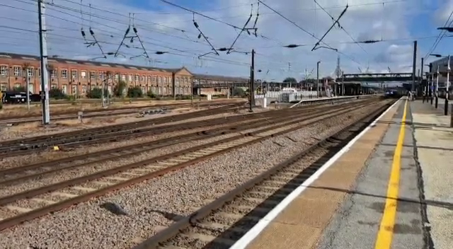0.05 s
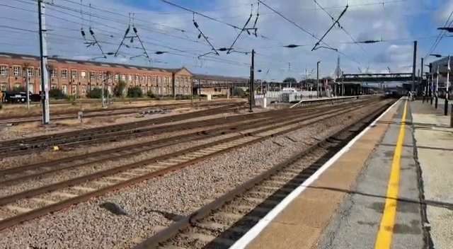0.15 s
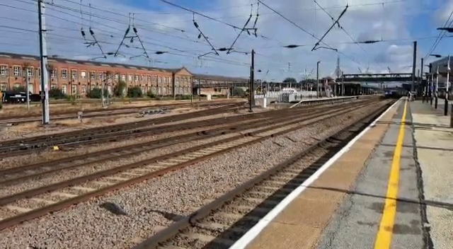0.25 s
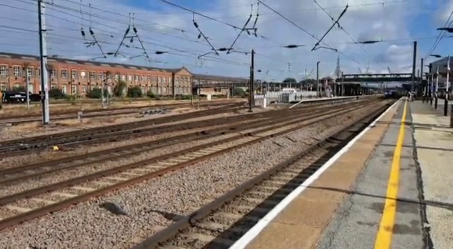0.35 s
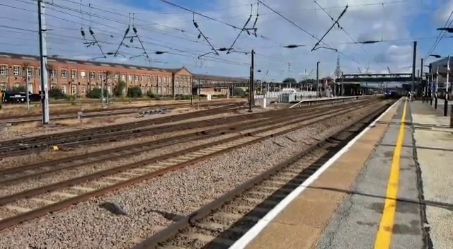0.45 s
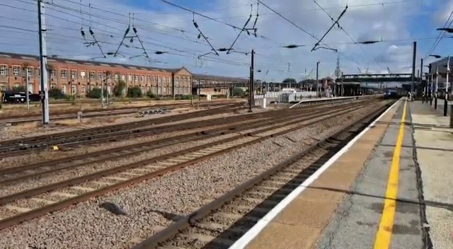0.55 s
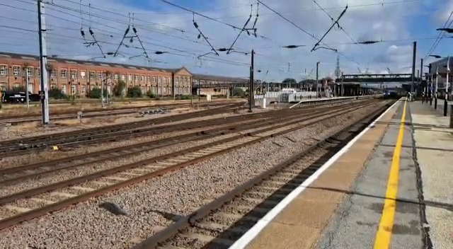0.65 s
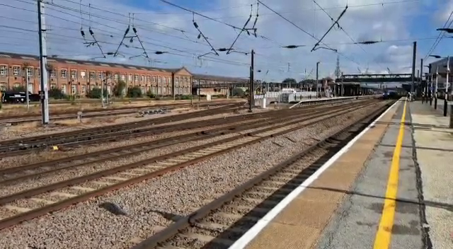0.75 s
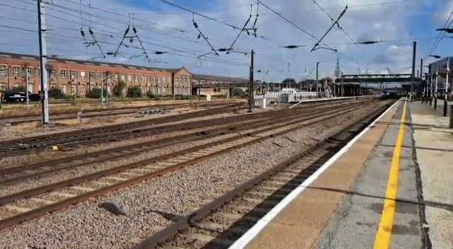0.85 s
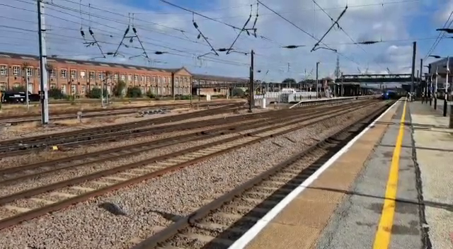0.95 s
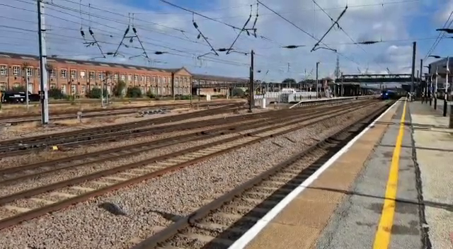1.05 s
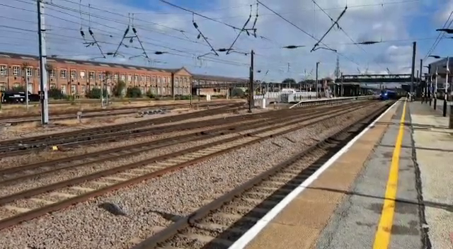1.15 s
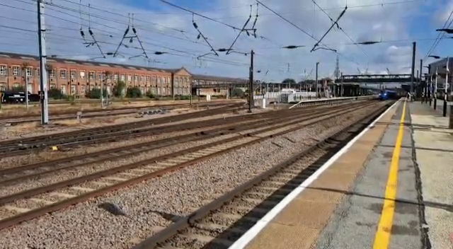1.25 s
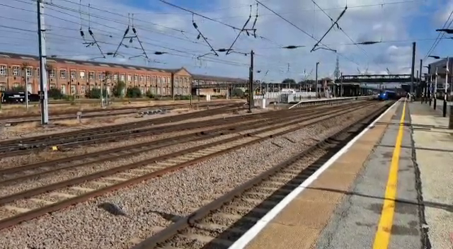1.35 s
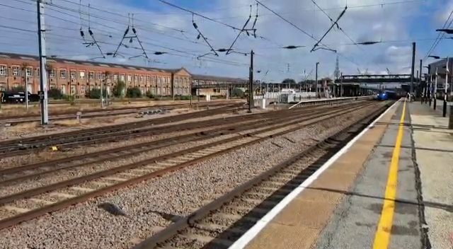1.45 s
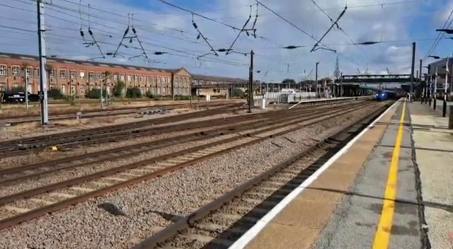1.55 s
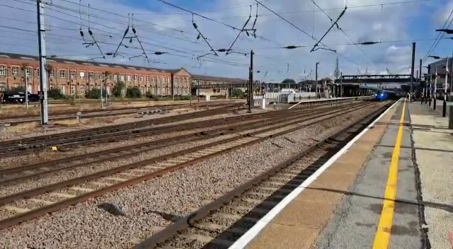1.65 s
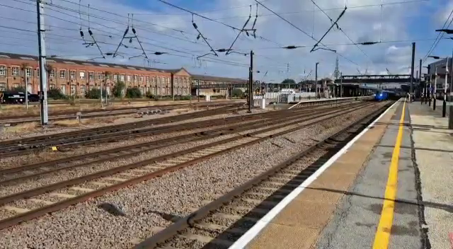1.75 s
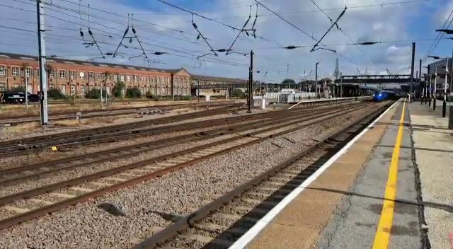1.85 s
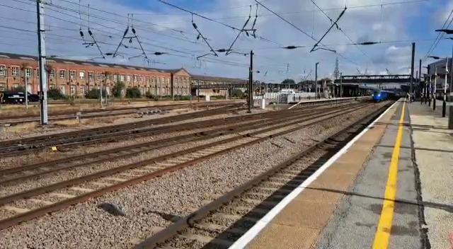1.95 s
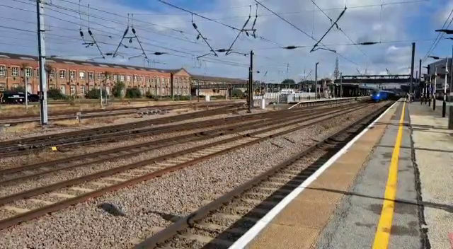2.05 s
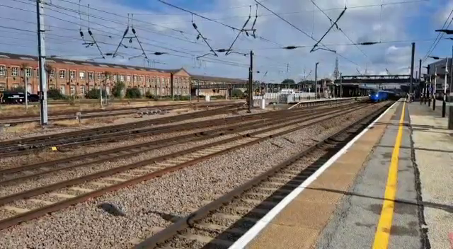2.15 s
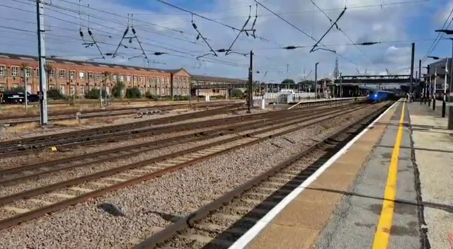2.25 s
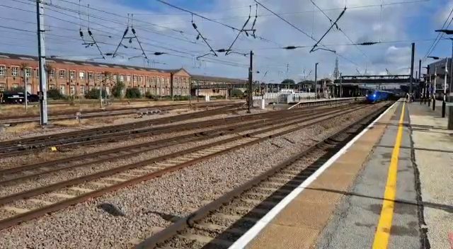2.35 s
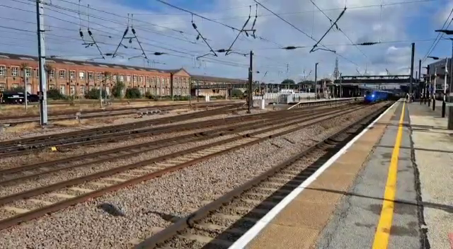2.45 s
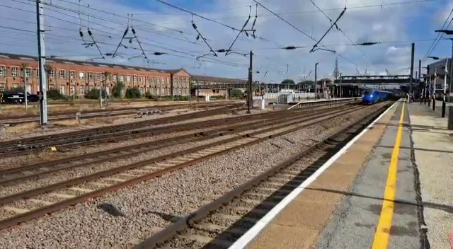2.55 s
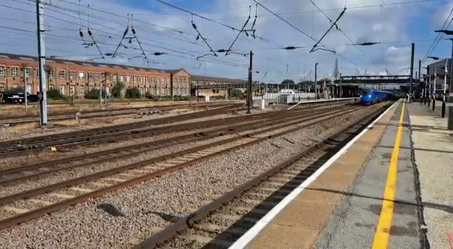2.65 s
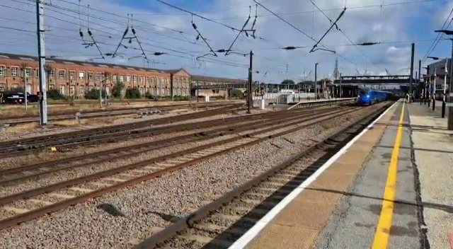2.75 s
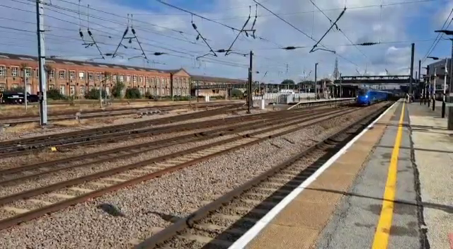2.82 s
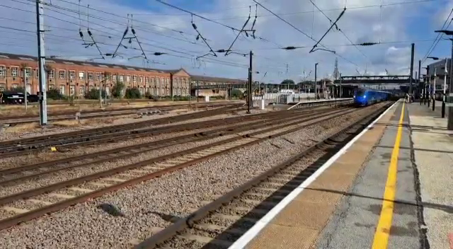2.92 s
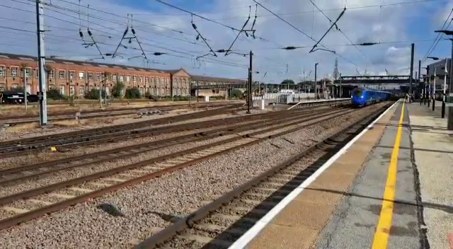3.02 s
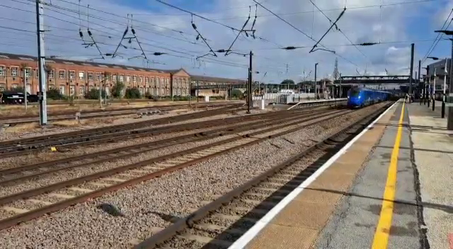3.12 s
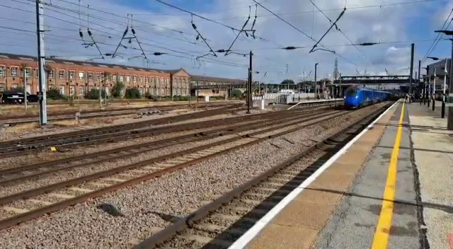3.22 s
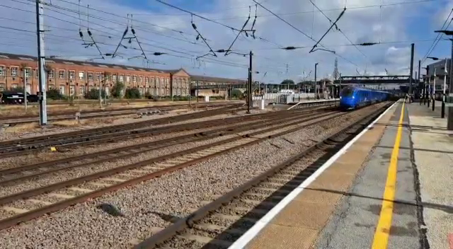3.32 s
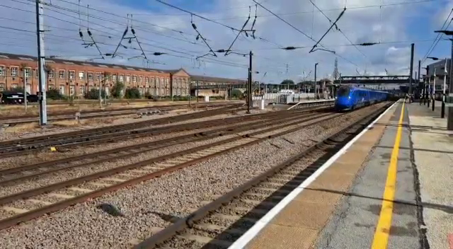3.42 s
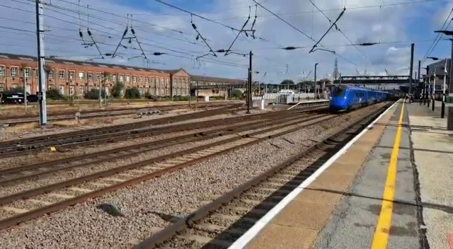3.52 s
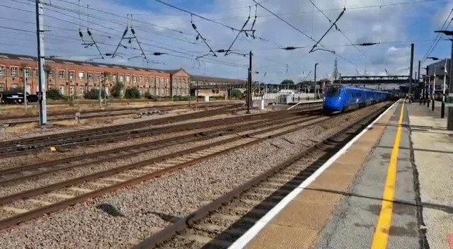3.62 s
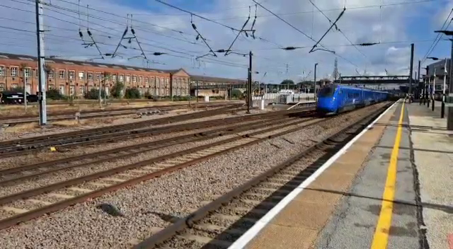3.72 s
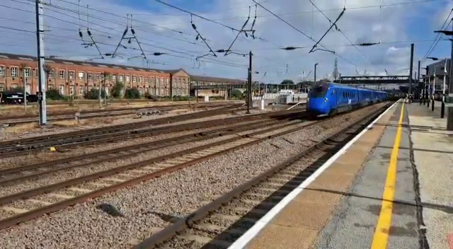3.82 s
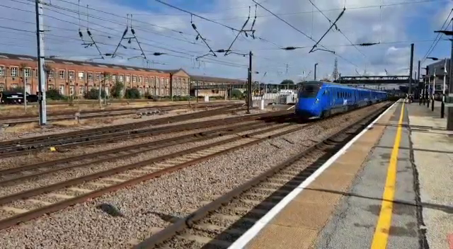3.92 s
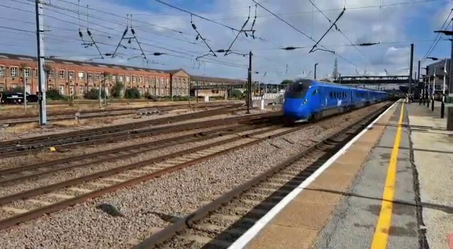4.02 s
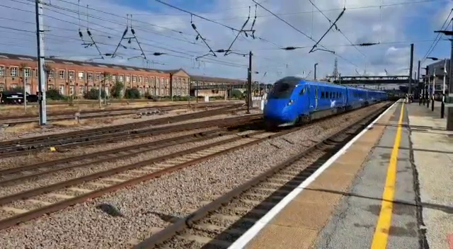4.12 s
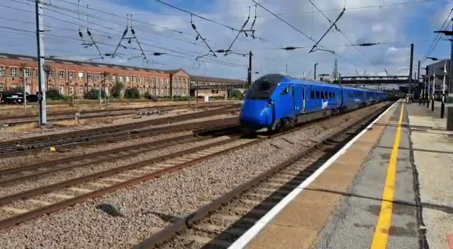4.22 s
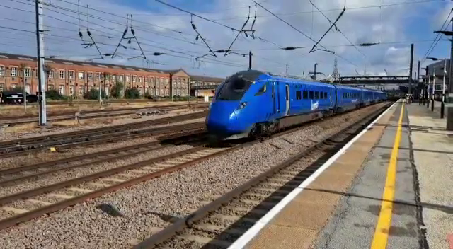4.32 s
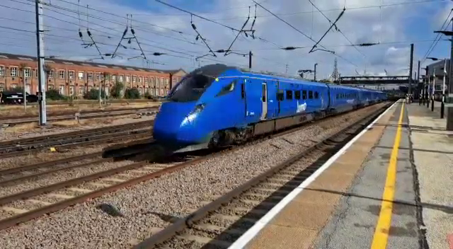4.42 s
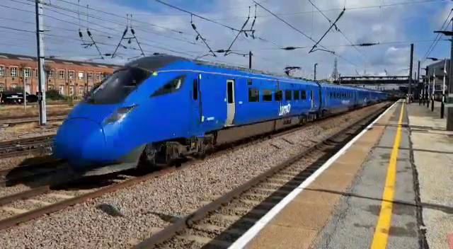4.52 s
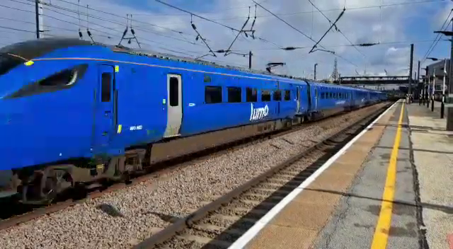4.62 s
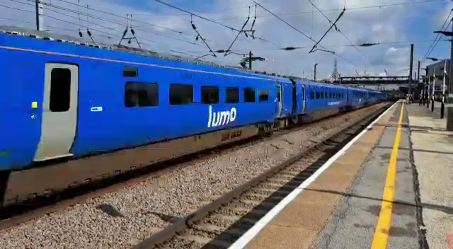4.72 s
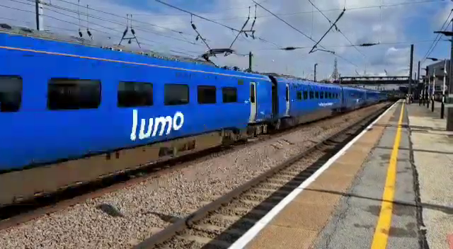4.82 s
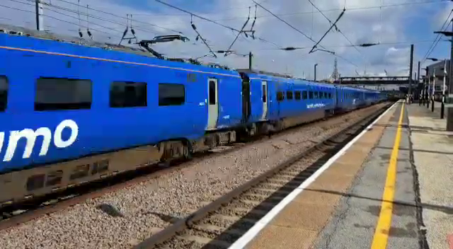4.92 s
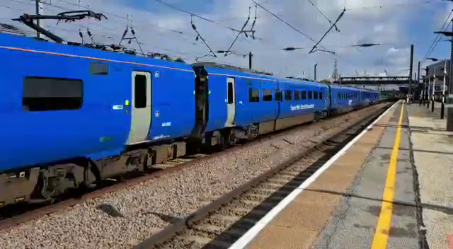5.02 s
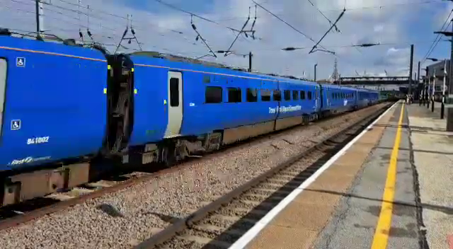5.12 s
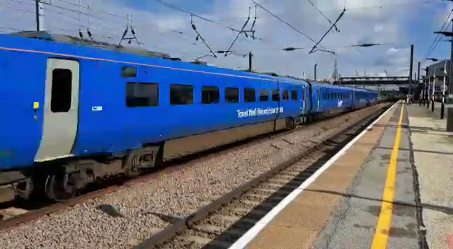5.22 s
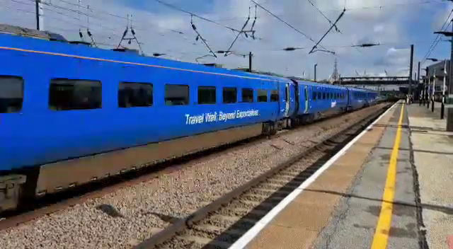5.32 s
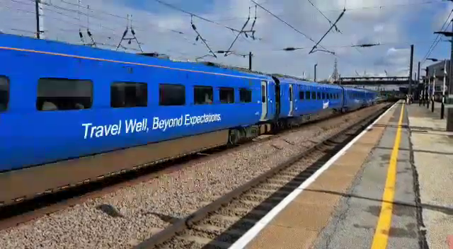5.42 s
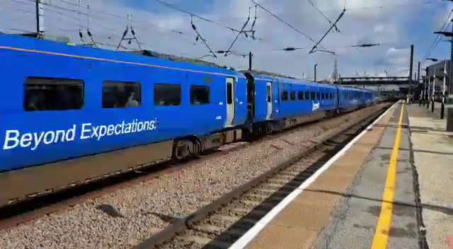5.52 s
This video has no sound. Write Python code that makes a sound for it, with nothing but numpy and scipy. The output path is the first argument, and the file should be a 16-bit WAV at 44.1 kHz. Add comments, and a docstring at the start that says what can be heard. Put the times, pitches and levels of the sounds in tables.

```python
"""An electric express train runs through a station, heard from the platform in a light wind.
At first it is a distant roar, and a small bird calls over it. The wheels knock over the points
(the track switches) and shake the rails, which sing at their own pitches with a steely sizzle on top.
Then the coaches rush past, rolling and rumbling; the nose pushes air against the microphone and
the motors whine by, falling in pitch."""
import sys
import numpy as np
from scipy import signal
from scipy.fft import rfft, irfft, next_fast_len
from scipy.io import wavfile
from scipy.ndimage import uniform_filter1d

SR = 44100
rng = np.random.default_rng(int(sys.argv[2]) if len(sys.argv) > 2 else 0)


def generate_wav(sig):
    """Save sig (samples, or channels by samples) to the path in sys.argv[1] as 16-bit PCM at SR."""
    pcm = np.round(np.clip(np.atleast_2d(sig).T, -1, 1) * 32767).astype(np.int16)
    wavfile.write(sys.argv[1], SR, pcm)


N = 245637
SIZE = next_fast_len(N, True)
TIME, HZ = np.arange(N) / SR, np.fft.rfftfreq(SIZE, 1 / SR)
# The train's nose reaches the points, then draws level with the microphone.
POINTS_S, ARRIVAL_S, SPEED_M_PER_S, TRACK_DISTANCE_M = 2.673, 4.714, 46.4, 12.45


def amp(db):
    """Turns decibels into a gain."""
    return 10 ** (np.asarray(db) / 20)


def unit(x):
    """Scales a signal to an average (rms) level of one."""
    return x / np.sqrt(np.mean(x ** 2) + 1e-20)


def along(points):
    """Joins (Hz, value) points into a curve over all frequencies."""
    hz, value = np.transpose(points)
    return np.interp(np.log(HZ + 1), np.log(hz + 1), value)


def wander(rate_hz):
    """A random wobble of size one, no faster than about the given rate."""
    return unit(irfft(rfft(rng.standard_normal(SIZE)) / (1 + (HZ / rate_hz) ** 4), SIZE)[:N])


def ringing(modes):
    """A tone colour with a steep peak at each mode, a pitch at which something likes to ring."""
    peaks = (amp(db) ** 2 / (1 + ((HZ - hz) / (0.58 * width)) ** 2) ** 2 for hz, width, db in modes)
    return np.sqrt(sum(peaks))


def steady(x, samples):
    """Evens out the slow level of a noise, keeping its fast flutter."""
    power = uniform_filter1d(uniform_filter1d((x ** 2).mean(0), samples), samples // 2)
    return x / np.sqrt(abs(power) + 1e-9)


def add(mix, s, sound):
    """Mixes a sound in, starting at s seconds."""
    part = mix[max(round(s * SR), 0):][:len(sound)]
    part += sound[:len(part)]


def ramp(start_s, length_s):
    """Rises evenly from zero to one."""
    return np.clip((TIME - start_s) / length_s, 0, 1)


def arch(s, length):
    """A smooth rise and fall with its middle at s seconds."""
    return np.cos(np.pi * np.clip((TIME - s) / length, -.5, .5)) ** 2


def swells(rows):
    """A gain that swells out of silence and back."""
    return sum(amp(db) * arch(s, length) for s, length, db in rows)


def surges(rows):
    """A gain that briefly lifts or dips around one."""
    return amp(sum(db * arch(s, length) for s, length, db in rows))


def doublings(t):
    """How many times the train's distance is doubled, compared with its closest."""
    ahead_m = np.maximum(ARRIVAL_S - t, 0) * SPEED_M_PER_S
    return np.log2(np.hypot(ahead_m, TRACK_DISTANCE_M) / TRACK_DISTANCE_M)


# How the microphone's two sides differ. Each row: frequency in Hz, then the value noted.
LIKENESS = [(60, 0.92), (200, 0.99), (350, 0.89), (600, 0.88), (1100, 0.8), (1800, 0.79), (2600, 0.43),
            (4000, 0.13), (7000, 0.44), (9000, 0.67), (15000, 0.72)]  # how alike they are, from 0 to 1
LEFT_LEAD = [(300, 0), (450, .9), (660, .75), (850, 2.5), (1150, 3.2), (1750, 5.0), (2100, 6.3),
             (3200, 9.4), (4200, 12.6), (6500, 18.3), (7500, 18.85)]  # how far the left is ahead, in radians
LEFT_LOUDER = [(200, -1), (400, 1), (600, 1.3), (900, -3), (1400, -1.5), (1800, -1), (3500, -2), (8000, -1),
               (13000, 0.3)]  # how much louder the left is, in dB


def noise(colour, lead=None):
    """Stereo noise of a given tone colour; it comes from the track unless a lead is given."""
    a, b, c, d = rng.standard_normal((4, len(HZ)))
    left, unrelated = a + 1j * b, c + 1j * d
    same = np.clip(along(LIKENESS), 0, 1)
    delay = np.exp(-1j * (along(LEFT_LEAD) if lead is None else lead))
    right = (same * left + np.sqrt(1 - same ** 2) * unrelated) * delay * amp(-along(LEFT_LOUDER))
    return unit(irfft(np.array([left, right]) * colour, SIZE)[:, :N])


def stereo(x):
    """A sound from down the track reaches the left side first."""
    return np.array([x, irfft(rfft(x, SIZE) * np.exp(-1j * along(LEFT_LEAD)), SIZE)[:N]])


def echoes(x, fade_s, echo_db):
    """Adds a wash of echoes from the platforms and buildings."""
    tail = rng.standard_normal((2, SR)) * amp(-60 * TIME[:SR] / fade_s)
    wash = signal.fftconvolve(x[None], tail / np.linalg.norm(tail[0]), axes=1)[:, :N]
    return stereo(x) + amp(echo_db) * wash


def flaring(modes, depth_db, rate_hz):
    """Ringing bands of noise, each flaring up and fading on its own."""
    bands = (amp(db) * np.sqrt(width) * noise(ringing([(hz, width, 0)])) for hz, width, db in modes)
    return unit(sum(band * amp(depth_db * wander(rate_hz)) for band in bands))


def wavering_tone(hz, waver_hz):
    """Steel shaken at random rings with an almost pure tone, wavering in pitch and level."""
    angle = 2 * np.pi * np.cumsum(hz + waver_hz * wander(26)) / SR
    return np.sin(angle) * amp(2.1 * wander(18))


# The far train's roar. Each row: frequency in Hz, relative level in dB.
ROAR_COLOUR = [(110, -12), (260, -3.5), (450, -12), (700, -0.5), (1000, -7), (1500, -9.5), (1950, -27.5),
               (2500, -21.5), (3500, -35), (4800, -32.5), (6000, -41), (7800, -39.5), (9500, -51),
               (15000, -56)]
# The rails' faint ringing. Each row: pitch in Hz, width in Hz, relative level in dB.
FAR_RAIL_MODES = [(593, 146, 1), (1330, 150, -6.5), (1824, 200, -5)]


def distant_train(db_per_doubling=16.5):
    """The far train roars dully and sets the rails ringing, growing until it reaches the points."""
    farther = np.maximum(doublings(TIME) - doublings(POINTS_S), 0)
    level = amp(-db_per_doubling * farther) * surges([(2.15, 0.42, 5.6)])  # swells on the far points
    drift, flare = amp(.5 * wander(14)), amp(1.2 * wander(20))
    roar = amp(-33) * noise(amp(along(ROAR_COLOUR))) * drift
    ring = amp(-37.5) * noise(ringing(FAR_RAIL_MODES)) * flare
    return level * (roar + ring)


# The rail yard's hush. Each row: frequency in Hz, relative level in dB.
HUSH_COLOUR = [(100, -27), (300, -11), (500, 4.5), (1100, -7.5), (2000, 3), (3300, -11.5), (4900, -13),
               (6200, -20), (7700, -22), (9000, -31), (11000, -31.5), (15500, -31)]


def yard_hush(lag_s=0.00017):
    """A steady background hush that reaches the right side first."""
    return amp(-53.5) * noise(amp(along(HUSH_COLOUR)), lead=-2 * np.pi * HZ * lag_s)


# Gusts of wind. Each row: middle in seconds, length in seconds, level in dB.
GUSTS = [(.25, 0.2, -53), (.51, 0.12, -43.5), (.64, 0.076, -39), (.78, 0.12, -41), (.94, 0.043, -42),
         (1.1, 0.19, -37), (1.21, 0.072, -36.5), (1.33, .07, -43.5), (1.55, 0.38, -37), (1.74, 0.18, -32.5),
         (2.09, 0.27, -38.5), (2.35, 0.1, -28.5), (2.73, 0.15, -34.5), (3.05, 0.22, -40), (3.28, 0.14, -39)]
# Air hitting the microphone. Each row: frequency in Hz, relative level in dB.
WIND_COLOUR = [(15, -45), (30, -8.5), (55, 3), (88, -12), (140, -2), (220, -16.5), (330, -14), (600, -24),
               (1500, -70), (5000, -98)]


def wind(start_db=-48.5, full_db=-40, freshen_s=2.4, lumps_db=2.5):
    """Short gusts buffet the microphone over a lumpy breeze that picks up and then holds."""
    breeze = amp(start_db + (full_db - start_db) * ramp(0, freshen_s) + lumps_db * wander(13))
    return (breeze + swells(GUSTS)) * steady(noise(amp(along(WIND_COLOUR))), samples=2600)


# Bird chirps. Each row: start and length in seconds, first and last pitch in Hz, level in dB.
CHIRPS = [(0.655, 0.16, 7950, 7030, -63.5), (0.914, .12, 8400, 7040, -64.5), (1.01, 0.095, 6800, 6070, -68)]


def bird(flutter_hz=240):
    """A small bird far off in the yard gives thin, falling calls with a quick flutter."""
    calls, flutter = np.zeros(N), flutter_hz * wander(254)
    for s, length, start_hz, end_hz, db in CHIRPS:
        count = int(length * SR)
        hz = np.linspace(start_hz, end_hz, count) + flutter[int(s * SR):][:count]
        add(calls, s, amp(db) * np.sin(2 * np.pi * np.cumsum(hz) / SR) * signal.windows.tukey(count, .5))
    return echoes(calls, fade_s=1.0, echo_db=5)


# Rolling noise and low rumble. Each row: frequency in Hz, relative level in dB.
ROLL_COLOUR = [(150, -51), (450, -7), (720, 2), (950, 5), (1200, -17), (1450, -36), (2300, -13.5),
               (2750, -8.5), (3500, -14.5), (4300, -18), (6000, -19), (9000, -56), (15500, -47)]
RUMBLE_COLOUR = [(15, -35), (35, -8), (60, 0), (88, -12), (125, -8), (180, -5.5), (240, -8), (370, -7.5),
                 (500, -19), (900, -73), (3000, -78)]
# Ringing wheels and booming track bed. Each row: pitch in Hz, width in Hz, relative level in dB.
WHEEL_MODES = [(1310, 120, 5.5), (3470, 110, -6), (3800, 480, -29), (4870, 110, -10), (5470, 170, -18.5),
               (6500, 79, -11.5)]
BED_MODES = [(66, 12, 0), (184, 13, -.5)]
# Bogies (the wheeled frames under a coach) going by. Each row: middle and length in seconds, lift in dB.
BOGIE_SURGES = [(4.88, .3, 1.5), (5.22, 0.098, 1)]


def coaches(emerge_s=0.9):
    """Wheels roll and ring, bogies rumble and the track bed booms, louder as the train nears."""
    away, emerged = doublings(TIME), ramp(POINTS_S - emerge_s, emerge_s)
    roll_gain = amp(-5.5 * away) * emerged ** 2 * surges(BOGIE_SURGES)
    rumble_gain = amp(-6.5 * away) * emerged
    rolling = amp(-24) * noise(amp(along(ROLL_COLOUR))) * amp(1.57 * wander(55))
    wheels = amp(-31) * flaring(WHEEL_MODES, depth_db=6.5, rate_hz=15)
    rumble = amp(-24) * noise(amp(along(RUMBLE_COLOUR)))
    # The boom travels along the track and builds up just ahead of the train.
    boom_level = amp(np.interp(TIME, [2.6, 4.1, 4.8], [-25.5, -24, -30.5]))
    boom = boom_level * steady(noise(ringing(BED_MODES)), samples=9000)
    return roll_gain * (rolling + wheels) + rumble_gain * (rumble + boom)


# Bogies clacking, first far off, then alongside. Each row: start in seconds, level in dB.
CLACKS = [(2.045, -39.5), (2.105, -37), (2.143, -32), (2.295, -34), (2.36, -35.5), (2.485, -36),
          (2.608, -40), (3.262, -26), (4.405, -26), (4.535, -18.5), (4.6, -30), (4.66, -19), (4.845, -17),
          (4.91, -24), (4.975, -21)]
# The tone of a clack. Each row: frequency in Hz, relative level in dB.
CLACK_COLOUR = [(200, -29), (500, -32), (750, 4), (1100, 0), (1500, 7.5), (1900, -9), (3000, -15),
                (6000, -62), (15000, -60)]


def clatter(peak_s=0.012):
    """Each bogie gives a short, dry burst of noise."""
    bursts, t = np.zeros(N), TIME[:SR // 5]
    for s, db in CLACKS:
        add(bursts, s, amp(db) * t / peak_s * np.exp(1 - t / peak_s))
    return bursts * noise(amp(along(CLACK_COLOUR)))


def fade_after_nose(db_per_s=2):
    """The rails' sound fades once the nose has gone by."""
    return amp(-db_per_s * np.maximum(TIME - ARRIVAL_S, 0))


# The front wheels cross rail joints.
# Each row: start and build-up time in seconds, relative levels of ring and sizzle in dB.
RAIL_JOINTS = [(2.15, 0.26, -75, -63), (2.675, 0.012, -32, -57), (2.97, 0.085, -32.5, -52),
               (3.28, 0.21, -27, -39.5), (3.7, 0.3, -25, -35.5)]


def carried_by_rails():
    """Gains of ring and sizzle: as the wheels pass the joints, more gets through to the near rails."""
    gains = np.zeros((2, N))
    for s, rise, ring_db, sizzle_db in RAIL_JOINTS:
        gains += ramp(s, rise) * (amp([[ring_db], [sizzle_db]]) - gains)
    return gains * fade_after_nose()


# The rails' highest ringing. Each row: pitch in Hz, width in Hz, relative level in dB.
SIZZLE_MODES = [(4600, 300, -11), (6923, 110, 3), (7535, 80, 3.5), (8630, 130, -7), (9180, 140, -10),
                (9770, 140, -8), (10330, 150, -10), (10900, 150, -10), (11511, 60, 1), (12090, 150, 1),
                (12400, 500, -4), (12680, 250, -2), (13176, 110, -2), (13500, 600, -8), (14400, 200, -13),
                (15200, 500, -15)]
# The hiss of wheel on rail. Each row: frequency in Hz, relative level in dB.
HISS_COLOUR = [(3000, -40), (5500, -5), (7200, -2), (8200, -3), (10500, -5.5), (12000, 0.5), (13000, -4.5),
               (14200, -7), (15500, -13)]


def sizzle(sting_s=2.12, sting_fade_s=.2):
    """The rails' highest ringing carries far; close by, the plain hiss of the wheels takes over."""
    _, level = carried_by_rails()
    # The first wheel on the points gives a sharp sting of treble.
    sting = (TIME > sting_s) * amp(-58 - 60 * abs(TIME - sting_s) / sting_fade_s)
    ring_share = np.interp(TIME, [2.3, 3.1, 4.2, 4.9], [.1, 0.66, 0.79, 0.31])
    ring = np.sqrt(ring_share) * flaring(SIZZLE_MODES, depth_db=3.2, rate_hz=28)
    hiss = np.sqrt(1 - ring_share) * noise(amp(along(HISS_COLOUR)))
    grit = amp(.6 * wander(40) + 1.1 * wander(400))
    return amp(0.95) * (level + sting) * (ring + hiss) * grit


# Swells of the two whining tones. Each row: middle and length in seconds, relative level in dB.
LOWER_WHINE_SWELLS = [(3.82, 0.28, -22.5), (4.03, .35, -27), (4.35, 0.28, -28), (4.72, 0.091, -25.5),
                      (5.04, 0.077, -23.5), (5.28, 0.46, -27.5), (5.56, 0.099, -26)]
UPPER_WHINE_SWELLS = [(3.82, 0.24, -32), (4.2, 0.18, -30), (4.47, 0.13, -25), (4.72, .16, -32)]


def rail_whine(lower_hz=1744, upper_hz=2320):
    """Two sharp pitches of the rails stand out as a high whine that comes in swells."""
    ring_gain, _ = carried_by_rails()
    lower_level = amp(-6.5) * ring_gain + swells(LOWER_WHINE_SWELLS)
    upper_level = amp(-11.5) * ring_gain + swells(UPPER_WHINE_SWELLS)
    lower = amp(1.5) * lower_level * wavering_tone(lower_hz, waver_hz=6.3)
    upper = amp(-0.5) * upper_level * wavering_tone(upper_hz, waver_hz=12.3)
    return stereo(lower + upper)


# The rails' low hum and high ring. Each row: pitch in Hz, width in Hz, relative level in dB.
HUM_MODES = [(607.4, 33, 2), (633.5, 56, -1), (556.7, 39, 0.5), (690, 170, -7.5), (1166, 107, -3)]
RING_MODES = [(1241, 130, -4), (1616, 260, -6.5), (1767, 180, -1.5), (1951, 33, -2), (2120, 290, -10.5),
              (2198, 6.3, 3.5), (2250, 14, 0), (2356, 69, -6.5)]
# Their lifts and dips. Each row: middle in seconds, length in seconds, change in dB.
HUM_SURGES = [(2.78, 0.24, 3.5), (2.925, 0.19, -6), (3.19, 0.12, 3.5), (3.5, 0.26, 3), (4.05, 0.48, -2),
              (4.66, 0.25, 4), (4.785, 0.1, -12), (5.47, 0.18, -8.5)]
RING_SURGES = [(2.695, .05, 1.5), (2.9, 0.17, 1), (3.24, 0.31, -3), (4.18, 0.29, 4)]
# How much of the hum is a pure tone. Each row: time in seconds, share from 0 to 1.
HUM_PURITY = [(2.7, 0.18), (3.2, 0.36), (3.6, 0.34), (4.5, 0.33), (4.9, 0)]


def rail_song(hum_db=-21.5, hum_rise_s=0.029):
    """Rough wheels shake the rails; the rails stay put, so their pitches hold as the train passes."""
    hum_level = amp(hum_db) * ramp(POINTS_S, hum_rise_s) * surges(HUM_SURGES) * fade_after_nose()
    purity = np.interp(TIME, *np.transpose(HUM_PURITY))
    tone = np.sqrt(purity) * unit(stereo(wavering_tone(HUM_MODES[0][0], waver_hz=3.8)))
    fuzz = np.sqrt(1 - purity) * steady(noise(ringing(HUM_MODES)), samples=3600)
    ring_gain, _ = carried_by_rails()
    ring = amp(1.4) * noise(ringing(RING_MODES)) * amp(1.53 * wander(55))
    return hum_level * (tone + fuzz) + ring_gain * surges(RING_SURGES) * ring


# Wheels knocking over the points. Each row: start in seconds, peak level before echoes in dB.
KNOCKS = [(2.755, -9), (2.825, -13), (2.886, -11.5), (3.175, -15.5), (4.685, -15)]


def wheel_knocks(rise_s=0.0078):
    """Each blow of a wheel makes the rails' low pitches swell and die away."""
    blows, t = np.zeros(N), TIME[:SR // 4]
    ring = sum(amp(db) * np.sqrt(width) * np.exp(-np.pi * width * t) * np.sin(2 * np.pi * hz * t)
               for hz, width, db in HUM_MODES)
    ring *= (1 - np.exp(-t / rise_s)) ** 2
    for s, db in KNOCKS:
        add(blows, s, amp(db) * ring / abs(ring).max())
    return echoes(blows, fade_s=.3, echo_db=-10)


def wind_thump(start_s=2.8, length_s=0.0077, db=-20):
    """One push and pull of wind gives a low thump."""
    thump, count = np.zeros(N), int(length_s * SR)
    cycle = np.sin(np.linspace(0, 2 * np.pi, count)) * signal.windows.tukey(count, .5)
    add(thump, start_s, amp(db) * cycle)
    return thump


def bow_wave(middle_s=4.81, length_s=0.56, db=-23.5):
    """Air pushed aside by the train's nose buffets the microphone."""
    return amp(db) * arch(middle_s, length_s) * steady(noise(amp(along(WIND_COLOUR))), samples=4000)


# Powered bogies whining past, one list for each. Each row: time in seconds, pitch in Hz, level in dB.
MOTOR_GLIDES = [
    [(4.7, 3670, -54), (4.76, 3530, -37), (4.87, 3480, -34), (4.9, 3050, -46), (4.93, 2880, -32),
     (4.97, 2770, -50)],
    [(4.86, 2400, -46), (4.93, 2294, -44), (4.98, 2002, -21), (5.02, 1860, -24), (5.07, 1664, -40.5),
     (5.14, 1520, -51)],
]


def motor(glide):
    """A narrow band of noise slides down in pitch as a powered bogie goes by."""
    s, hz, db = np.transpose(glide)
    angle = 2 * np.pi * np.cumsum(np.interp(TIME, s, hz)) / SR
    tone = wander(190) * np.cos(angle) + wander(180) * np.sin(angle)
    return stereo(tone * np.interp(TIME, s, amp(db), left=0, right=0))


def scene():
    """Rails, train, air and bird together."""
    rails = rail_song() + rail_whine() + wheel_knocks() + sizzle()
    distance = distant_train() + yard_hush()
    train = clatter() + coaches() + sum(motor(glide) for glide in MOTOR_GLIDES)
    air = wind() + wind_thump() + bow_wave()
    return rails + distance + train + air + bird()


def record(dry):
    """Cuts off the very highest treble."""
    lowpass = signal.firwin(511, 15700, window=("kaiser", 9), fs=SR)
    return signal.oaconvolve(dry, lowpass[None], "same")


dry = scene()
out = record(dry)
generate_wav(out)
```